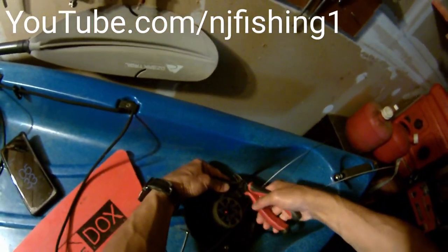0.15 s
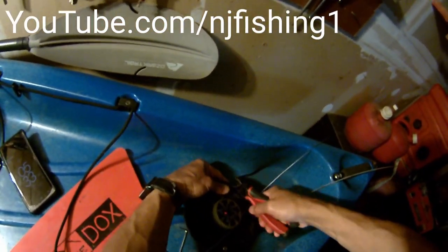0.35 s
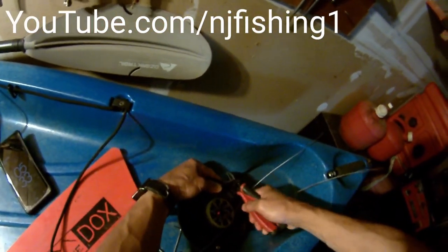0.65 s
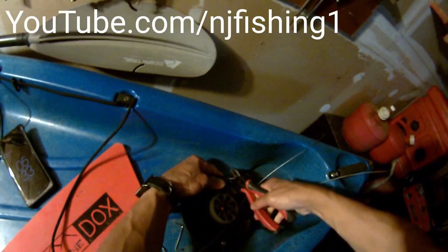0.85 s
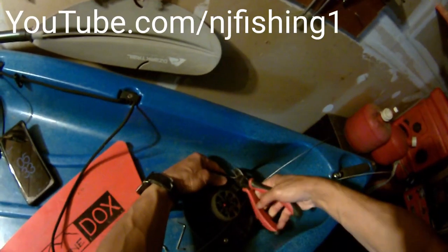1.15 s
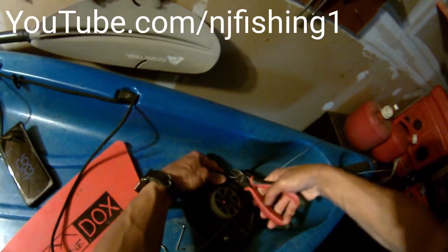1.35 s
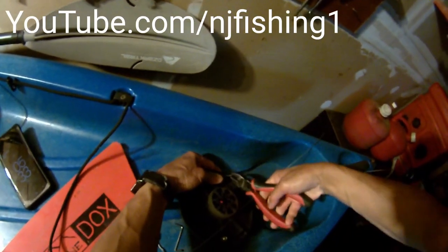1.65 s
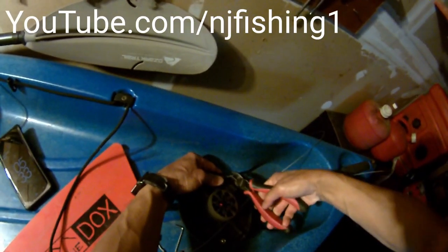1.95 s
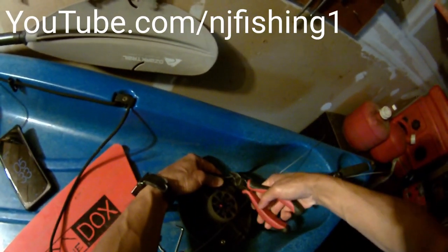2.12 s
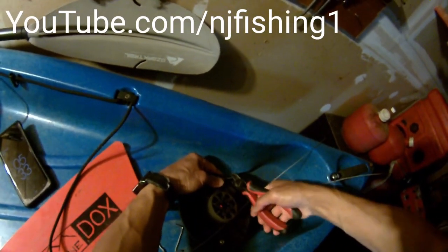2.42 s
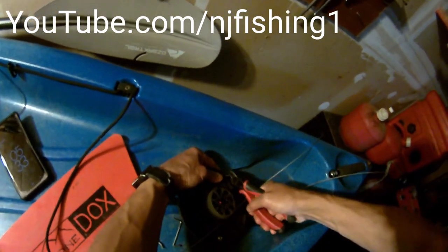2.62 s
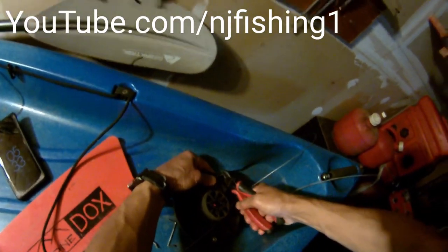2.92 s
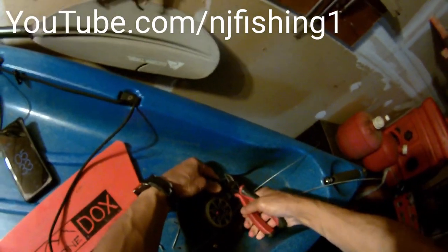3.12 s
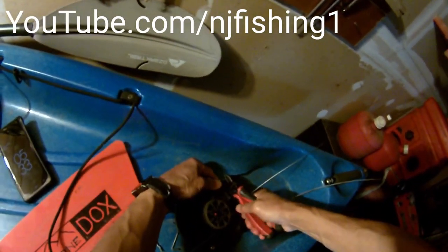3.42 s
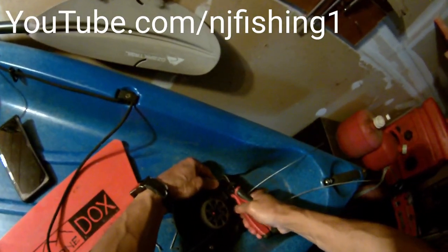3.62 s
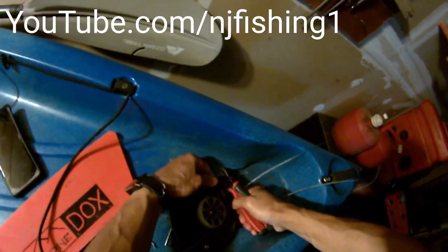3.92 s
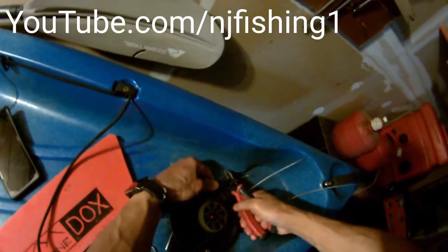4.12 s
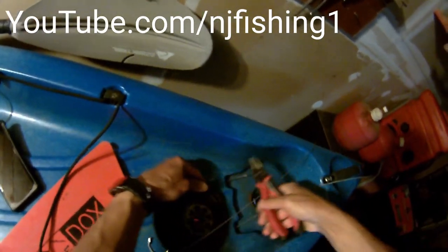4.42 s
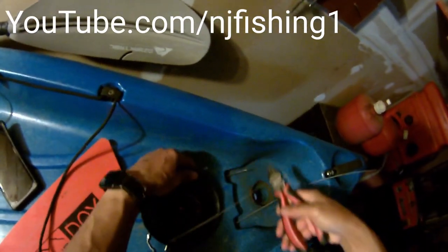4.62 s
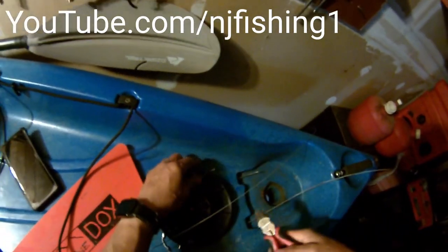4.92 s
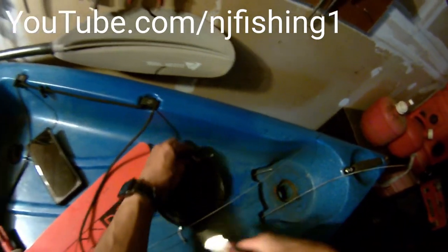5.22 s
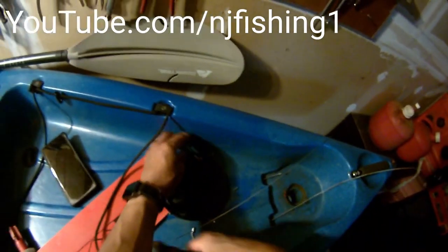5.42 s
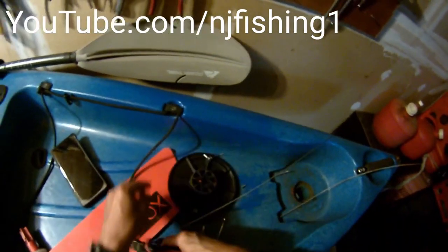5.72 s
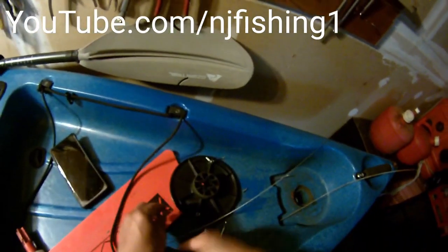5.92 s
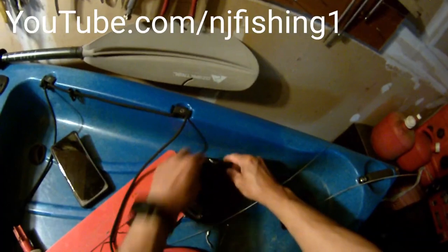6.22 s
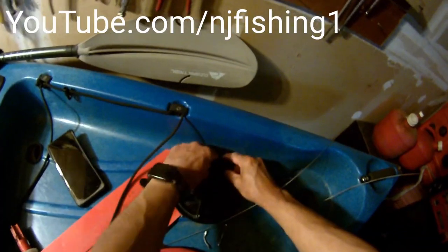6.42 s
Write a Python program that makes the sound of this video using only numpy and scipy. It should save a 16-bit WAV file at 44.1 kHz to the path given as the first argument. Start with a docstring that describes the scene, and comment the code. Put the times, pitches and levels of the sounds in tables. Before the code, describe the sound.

Faint metal clicks of pliers end in a sharp wire snap, followed by a scrape and a loud clatter on hollow plastic.

```python
"""Faint clicks and grinding of cutting pliers on a thin steel cable, over the hiss and rumble of a
head-worn camera in a garage. A plastic spool bumps the hollow hull of a kayak. The strands snap, the
jaws ring and the pliers spring open. The cable scrapes over the hull in tiny slips, then spool and
pliers land in it with a clatter that rings its modes. The camera's gain ducks after the loudest blows."""
import sys
import numpy as np
from scipy import signal
from scipy.fft import rfft, irfft
from scipy.io import wavfile
from scipy.ndimage import uniform_filter1d

SR = 44100
rng = np.random.default_rng(int(sys.argv[2]) if len(sys.argv) > 2 else 0)


def master(y):
    """Save y as 16-bit WAV."""
    cut = np.clip(np.atleast_2d(y).T, -1, 1)
    pcm = np.round(cut * 32767)  # scale
    wavfile.write(sys.argv[1], SR, pcm.astype(np.int16))


N = 288987


def gain_of(db):
    """Decibels to amplitude."""
    return 10 ** (np.asarray(db) / 20)


def unit_rms(x):
    """Scales to rms 1."""
    return x / np.sqrt(np.mean(x ** 2) + 1e-20)


def unit_blow(x):
    """Scales to the energy of 10 ms at rms 1."""
    return x * np.sqrt(SR / 100 / (np.sum(x ** 2) + 1e-20))


def at_hz(points, hz):
    """Interpolates a table on a log-frequency axis."""
    points_hz, value = np.transpose(points)
    return np.interp(np.log(hz + 1), np.log(points_hz + 1), value)


def add(mix, start_s, sound):
    """Mixes a sound in at start_s."""
    part = mix[round(start_s * SR):][:len(sound)]
    part += sound[:len(part)]


def band(x, low_hz, high_hz):
    """Causal band-pass."""
    return signal.sosfilt(signal.butter(2, [low_hz, high_hz], "band", fs=SR, output="sos"), x)


def noise(spectrum):
    """Steady shaped noise at rms 1."""
    shape = gain_of(at_hz(spectrum, np.fft.rfftfreq(N, 1 / SR)))
    return unit_rms(irfft(rfft(rng.standard_normal(N)) * shape, N))


def ring(hz, level_db, t60_s):
    """Free modes decaying after a blow."""
    t = np.arange(SR // 2)[:, None] / SR
    sign = (-1) ** np.arange(len(hz))
    modes = sign * gain_of(level_db - 60 * t / t60_s) * np.sin(2 * np.pi * hz * t)
    return unit_blow(modes.sum(1))


# air and microphone hiss: freq_hz, density_db
HISS_SPECTRUM = [(40, -17.5), (100, -4.5), (250, -2.5), (500, 0.5), (800, -3), (1700, -7.5), (3000, -10),
                 (6000, -12), (10000, -16.5), (15400, -18)]
# camera rumble: freq_hz, density_db
RUMBLE_SPECTRUM = [(10, -28), (22, -4), (30, -1), (42, -4.5), (55, -17), (110, -18.5), (200, -17.5),
                   (400, -35.5), (2000, -78)]
# camera sway: time_s, rumble_db
SWAY = [(0.0, -78), (0.11, -68), (0.63, -63), (2.3, -72), (2.66, -57), (3.24, -68), (3.96, -57),
        (4.78, -72), (5.99, -66), (6.5, -69)]

def background(hiss_db=-56.5):
    """Room air, microphone hiss and the rumble of the swaying camera."""
    rumble_db = np.interp(np.arange(N) / SR, *np.transpose(SWAY))
    return gain_of(hiss_db) * noise(HISS_SPECTRUM) + gain_of(rumble_db) * noise(RUMBLE_SPECTRUM)


# left-right hiss difference: freq_hz, density_db
SIDE_SPECTRUM = [(18, -78), (30, -50.5), (187, -1), (378, -1), (3960, -4), (15400, -7)]

def side_hiss(level_db=-67.5):
    """Hiss that differs between the ears."""
    return gain_of(level_db) * noise(SIDE_SPECTRUM)


# room decay: freq_hz, t60_s
GARAGE_DECAY = [(150, .45), (600, .36), (1500, .32), (5000, .32), (9000, .25), (15000, .16)]

def garage(x, delay_s=.012):
    """Dense reflections of random sign, each band decaying at its own rate."""
    taps = rng.choice([-1., 1.], SR) * (rng.random(SR) < .1)
    hz, t, spectra = signal.stft(taps, SR, nperseg=256)
    decay = gain_of(-60 * t / at_hz(GARAGE_DECAY, hz)[:, None])
    tail = signal.istft(spectra * decay, SR, nperseg=256)[1]
    tail = np.pad(tail / np.linalg.norm(tail), (int(delay_s * SR), 0))
    return signal.fftconvolve(x, tail)[:N]


# case response: freq_hz, gain_db
CASE_RESPONSE = [(60, 3), (180, 5), (400, 0), (900, 1), (1700, 0), (2100, -1), (2500, 3), (3300, -3),
                 (4200, 1), (5100, -1), (6200, 1), (6900, -7), (7800, -3), (9600, 1), (12000, -1),
                 (15000, 4)]

def camera_case(x, size=2048):
    """The case colours the sound passing through it: a minimum-phase filter."""
    log_gain = np.log(gain_of(at_hz(CASE_RESPONSE, abs(np.fft.fftfreq(size, 1 / SR)))))
    taps = np.fft.ifft(np.exp(np.conj(signal.hilbert(log_gain)))).real
    return signal.oaconvolve(x, taps[:size // 2])[:N]


# contact registers (thud, clack, tick, fizz): low_hz, high_hz
REGISTERS = [(280, 691), (1000, 1782), (3950, 5510), (7800, 11000)]

def contact(levels_db, t60_s, bass_hold, sharp):
    """A sharp push and a dense, short ring per register; low registers last longer."""
    t = np.arange(SR // 2) / SR
    out = np.zeros(len(t))
    push = sharp * unit_blow(t == 0)
    for (low_hz, high_hz), level_db in zip(REGISTERS, levels_db):
        register_t60_s = t60_s * (REGISTERS[1][0] / low_hz) ** bass_hold
        burst = unit_blow(rng.standard_normal(len(t)) * gain_of(-60 * t / register_t60_s))
        out += gain_of(level_db) * unit_blow(band(burst + push, low_hz, high_hz))
    return out


def register_levels(material_db, level_db, hardness_db_per_oct):
    """Material sets the balance of the four registers; hardness tilts it about the clack."""
    octaves = np.log2(REGISTERS).mean(1)
    return level_db + np.array(material_db) + hardness_db_per_oct * (octaves - octaves[1])


# cable rasping over an edge: pitch_hz, level_db, t60_s
CABLE_MODES = [(670, -3, .06), (1290, -3, .05), (1700, -2, .05), (2450, -4, .06), (2590, -1, .06),
               (2850, -4, .06), (3080, 0, .05), (4040, -3, .04), (4250, -3, .04), (5200, -3, .03),
               (5570, -2, .04), (5950, -4, .04)]

def friction(length_s, slips_per_s=550, hiss_gain=.07):
    """Tiny slips of twisted strands. Rows at rms 1: four registers, then the ringing cable."""
    chance, size, hiss = rng.random(SR), rng.standard_normal(SR), rng.standard_normal(SR)
    n = int(length_s * SR)
    slips = ((chance < slips_per_s / SR) * size + hiss_gain * hiss)[:n]
    rasp = signal.fftconvolve(slips, ring(*np.transpose(CABLE_MODES)))[:n]
    return np.array([unit_rms(band(slips, *edges_hz)) for edges_hz in REGISTERS] + [unit_rms(rasp)])


# steel sliding on steel: start_s, length_s, level_db, hardness_db_per_oct
GRIND_STROKES = [(0.295, .037, -62, 5), (0.845, .31, -58, -2), (1.646, .088, -53, 2), (1.849, .11, -61, 4),
                 (3.581, .18, -61, -1.5), (3.731, .091, -56, 0), (4.62, .17, -56, -4)]

def grinding(material_db=(0, -3, -4, -19.5), rasp_db=-10.5):
    """Each stroke is a swell of slips that sets the cable ringing."""
    out = np.zeros(N)
    for start_s, length_s, level_db, hardness in GRIND_STROKES:
        levels_db = [*register_levels(material_db, level_db, hardness), level_db + rasp_db]
        stroke = gain_of(levels_db) @ friction(length_s)
        swell = np.sin(np.linspace(0, np.pi, len(stroke)))
        add(out, start_s, stroke * swell)
    return out


# cable drag: time_s, low_db, middle_db, high_db
SCRAPE_LEVELS = [(5.2, -46, -56, -64), (5.216, -55, -53, -68), (5.238, -43, -41, -55),
                 (5.262, -45, -60, -52), (5.31, -56, -47, -38), (5.356, -38.5, -41, -42),
                 (5.386, -48, -54, -56), (5.402, -45, -46, -52), (5.44, -52, -60, -65)]

def scrape():
    """The cable drags over the hull: plastic answers low, strands rasp high."""
    out = np.zeros(N)
    time_s, *curves_db = np.transpose(SCRAPE_LEVELS)
    thud, clack, tick, fizz, rasp = friction(time_s[-1] - time_s[0], slips_per_s=450)
    t = time_s[0] + np.arange(len(rasp)) / SR
    low, middle, high = (gain_of(np.interp(t, time_s, db)) for db in curves_db)
    hull = gain_of(.5) * (low * thud + middle * clack)
    steel = gain_of(-2.5) * tick + gain_of(-23.5) * fizz + gain_of(-3) * rasp
    add(out, time_s[0], hull + high * steel)
    return out


# hull struck at places 0 and 1: pitch_hz, place0_db, place1_db, t60_s
HULL_MODES = [(205, -16, -15, .2), (328, -9, -5, .2), (468, -8, -14, .26), (1137, 2, -5, .22),
              (1278, -6, -16, .19), (1420, -6, -16, .17), (1491, -9, -8, .16), (1620, -15, -18, .2),
              (1728, -12, -22, .2), (1873, 4, -12, .14), (1938, -8, -14, .18), (2487, -18, -12, .08),
              (3745, -14, -18, .11), (3960, -11, -10, .13), (4226, -11, 0, .09), (4470, -15, -20, .13),
              (4651, -3, -17, .08), (5500, -17, -9, .1), (5722, -10, -3, .11), (5970, -10, -5, .07),
              (6255, -18, -24, .12), (6490, -30, -14, .09), (8258, -30, -26, .15), (9103, -22, -26, .12),
              (10180, -32, -21, .14)]

def hull_boom():
    """The three lowest modes of the hollow hull answer any jolt."""
    hz, mode_db, _, t60_s = np.transpose(HULL_MODES[:3])
    return ring(hz, mode_db, t60_s)


def hull_blow(level_db, hardness, place, material_db=(-2.5, -.5, -10.5, -32), treble_hz=4500):
    """The place struck weights the modes; a soft landing spares the high ones."""
    hz, place0_db, place1_db, t60_s = np.transpose(HULL_MODES)
    levels_db = register_levels(material_db, level_db, hardness)
    tick_db = levels_db[2] - level_db
    mode_db = place0_db + place * (place1_db - place0_db)
    mode_db += .25 * tick_db * np.minimum(hz / treble_hz, 1) ** 2
    # louder blows last longer and ring disproportionately more
    blow = contact(levels_db, t60_s=.26 * gain_of(.35 * level_db), bass_hold=.23, sharp=.26)
    ring_db = 6.8 + 1.65 * level_db
    return gain_of(-3) * blow + gain_of(ring_db) * ring(hz, mode_db, t60_s)


# plastic spool: pitch_hz, level_db, t60_s
SPOOL_MODES = [(315, -13, .06), (485, 0, .05), (585, -2, .04), (700, -7, .03), (850, -12, .03),
               (1330, -10, .04), (1580, -18, .04)]
# spool nudging the hull: start_s, ring_db, clack_re_ring_db
SPOOL_BUMPS = [(0.4658, -41.5, -28), (0.5803, -46, -0.5), (0.7504, -46.5, 3.5), (1.808, -43.5, -26),
               (2.6365, -30, -21), (3.1329, -40.5, -1), (3.141, -45.5, -2), (3.4493, -50.5, -15),
               (3.6006, -40, -2.5), (4.0842, -39.5, -6.5), (4.515, -34.5, -3), (4.6032, -46, 0.5),
               (4.676, -46, -2), (4.794, -37.5, -7.5), (5.0386, -43, -5), (5.1912, -47, -14),
               (5.45, -43, -5), (5.7734, -42, -7.5), (5.8393, -43.5, -11), (6.383, -45, -6.5),
               (6.4465, -47.5, -5.5), (6.5226, -45, -1.5)]

def spool(pitch_spread=.024, boom_db=-8):
    """Plastic on plastic: a soft clack and a short hollow ring that shifts with the grip."""
    out = np.zeros(N)
    hz, mode_db, t60_s = np.transpose(SPOOL_MODES)
    for start_s, ring_db, clack_re_ring_db in SPOOL_BUMPS:
        detune = 1 + pitch_spread * rng.uniform(-.86, 1)
        clack_db = ring_db + clack_re_ring_db
        levels_db = (ring_db - 6, clack_db, clack_db - 15, clack_db - 28)
        knock = contact(levels_db, t60_s=.071, bass_hold=.2, sharp=.67)
        hollow = ring(hz * detune, mode_db, t60_s) + gain_of(boom_db) * hull_boom()
        add(out, start_s, knock + gain_of(ring_db) * hollow)
    return out


# landings and bounces: start_s, level_db, hardness_db_per_oct, second_touch_db, place_0_to_1
LANDINGS = [(5.491, -21, 1.5, 0, 0.42), (5.5362, -27, -2.5, 4.5, .5), (5.5591, -36, -1, -14, .4),
            (5.5946, -41.5, -7, -13, .5), (5.9112, -11, 2, -16, 0), (5.9465, -20.5, -2.5, -12, 0.1),
            (6.0146, -29.5, -3.5, -8.5, .15), (6.1095, -13.5, 5.5, -1.5, 1), (6.2, -21.5, -1, -8, 0.67),
            (6.3141, -30, -1.5, -6, 0.35)]

def clatter(second_touch_s=.0072, dulling_db_per_oct=1.5, boom_db=-9.5):
    """Spool and pliers land in the hull: one edge first, the other just after and duller."""
    out = np.zeros(N)
    for start_s, level_db, hardness, second_touch_db, place in LANDINGS:
        first = hull_blow(level_db, hardness, place)
        second = hull_blow(level_db + second_touch_db, hardness - dulling_db_per_oct, place)
        add(out, start_s, first + gain_of(level_db + boom_db) * hull_boom())
        add(out, start_s + second_touch_s, second)
    return out


# jaws and cut end: pitch_hz, level_db, t60_s
JAW_MODES = [(1580, 0, .02), (1770, -6, .022), (2410, -15, .025), (4180, -11, .04), (4490, -10, .04),
             (4970, -9, .025), (5880, -3, .014), (9450, -8, .009)]
# jaws, pivot and cable clicking: start_s, level_db, hardness_db_per_oct, t60_s
JAW_CLICKS = [(0.0869, -54.5, 1.5, .05), (0.1621, -55, 6, .045), (1.0491, -47, -1.5, .03),
              (1.1452, -46.5, -3, 0.077), (1.159, -50.5, 2.5, .03), (1.283, -44, -2, .018),
              (1.4824, -48, 0, 0.036), (1.5182, -36.5, -2, 0.095), (1.5346, -34, -2.5, .032),
              (1.911, -46.5, 0, 0.018), (1.9447, -53, 3, .046), (2.718, -30, 6.8, .035),
              (2.7421, -32.5, -5.5, .055), (2.8, -43, 3.5, 0.039), (3.667, -49.5, 2.5, .03)]
# pliers springing open: start_s, level_db, hardness_db_per_oct
OPENING_KNOCKS = [(4.2769, -31.5, 0.5), (4.301, -28, -0.5)]

def pliers(click_db=(-9, -1, -9.5, -25), opening_db=(.5, -14, -9.5, -33), ring_db=-5.5):
    """Dry steel clicks as the jaws seat, slip and open."""
    out = np.zeros(N)
    jaws = ring(*np.transpose(JAW_MODES))
    for start_s, level_db, hardness, t60_s in JAW_CLICKS:
        click = contact(register_levels(click_db, level_db, hardness), t60_s, bass_hold=.04, sharp=.88)
        add(out, start_s, click + gain_of(level_db + ring_db + min(hardness, 0)) * jaws)
    for start_s, level_db, hardness in OPENING_KNOCKS:
        levels_db = register_levels(opening_db, level_db, hardness)
        add(out, start_s, contact(levels_db, t60_s=.017, bass_hold=.04, sharp=.75))
    return band(out, low_hz=370, high_hz=20000)  # a small tool radiates little bass


# strands cracking apart, then a duller, longer knock from the hull:
# start_s, thud_db, clack_db, tick_db, fizz_db, t60_s, ring_db
SNAP_BLOWS = [(3.964, -29, -19.5, -16, -20, .022, -10.5), (3.9705, -26, -23, -20, -32, .05, -23),
              (3.981, -24, -24, -27, -44, .16, -45)]

def snap(boom_db=-30):
    """The strands give way; the jaws slam shut and ring, and the hull answers."""
    out = np.zeros(N)
    jaws = ring(*np.transpose(JAW_MODES))
    for start_s, *levels_db, t60_s, ring_db in SNAP_BLOWS:
        blow = contact(levels_db, t60_s, bass_hold=.25, sharp=.3)
        add(out, start_s, blow + gain_of(ring_db) * jaws)
    add(out, SNAP_BLOWS[0][0], gain_of(boom_db) * hull_boom())
    return out


def scene():
    """Close sources with a little garage reverberation, in narrow stereo."""
    clicks, cut, bumps, drops, rubs = pliers(), snap(), spool(), clatter(), grinding() + scrape()
    sources = np.array([clicks, cut, bumps, drops, rubs])
    to_room = gain_of([-17.5, -14, -12.5, -17, -13.5]) @ sources
    mid = camera_case(sources.sum(0) + garage(to_room)) + background()
    side = gain_of(-26.5) * camera_case(garage(to_room, delay_s=0)) + side_hiss()
    return np.array([mid + side, mid - side])


def record(dry, threshold_db=-17.5, recover_db_per_s=9, lag_s=.015, sense_hz=1300, edge_hz=15500):
    """Treble-sensing gain control ducks just after a loud blow and creeps back; then clip and low-pass."""
    sensed = band(dry[0], sense_hz, edge_hz)
    power_db = 10 * np.log10(abs(uniform_filter1d(sensed ** 2, size=220)) + 1e-12)
    samples = np.arange(N)
    recovery_db = samples * recover_db_per_s / SR
    held_db = np.maximum.accumulate(power_db + recovery_db) - recovery_db
    over_db = np.maximum(held_db - threshold_db, 0)
    duck_db = np.interp(samples - lag_s * SR, samples, uniform_filter1d(over_db, size=200))
    clipped = np.clip(dry / gain_of(duck_db), -1, 1)
    low_pass = signal.firwin(511, edge_hz, window=("kaiser", 9), fs=SR)
    return signal.oaconvolve(clipped, low_pass[None], "same")


dry = scene()
out = record(dry)
master(out)
```